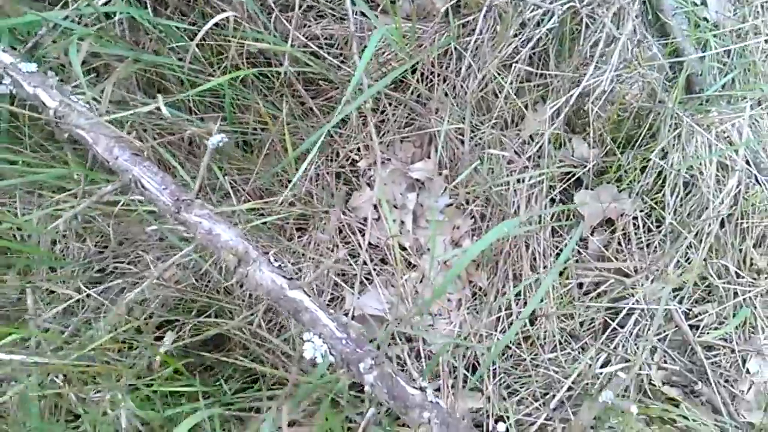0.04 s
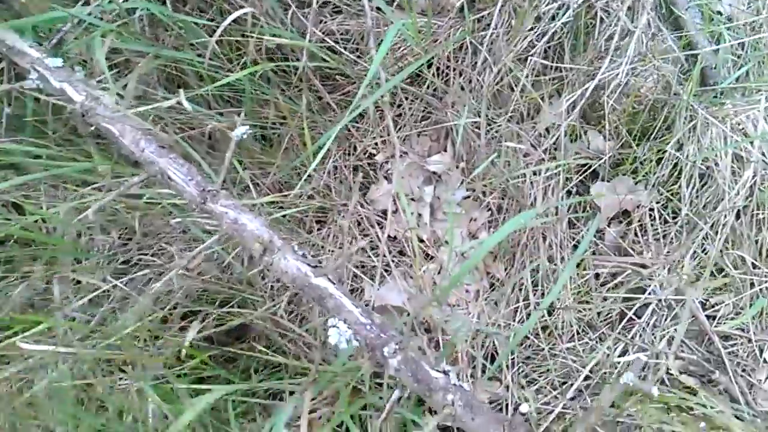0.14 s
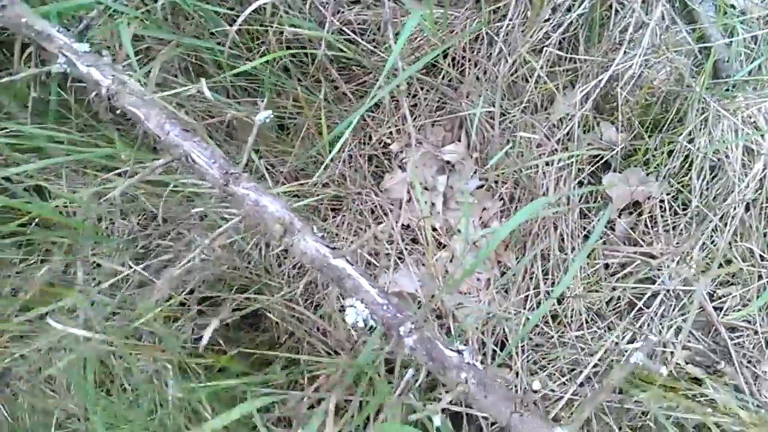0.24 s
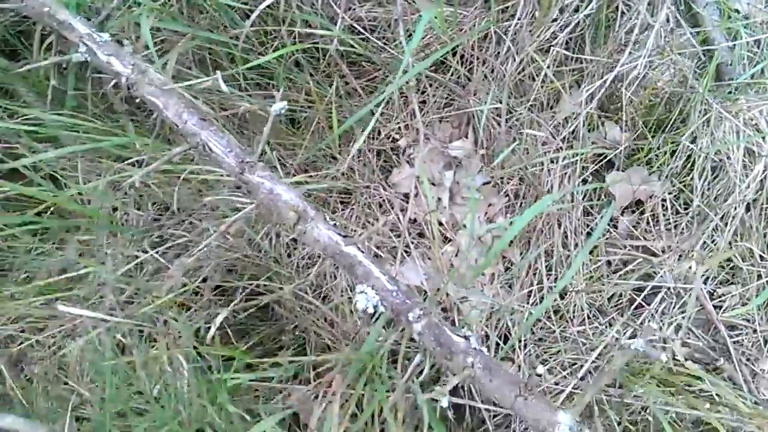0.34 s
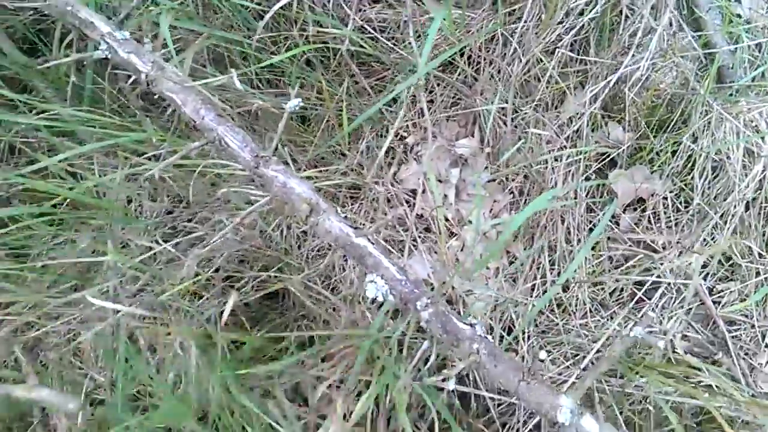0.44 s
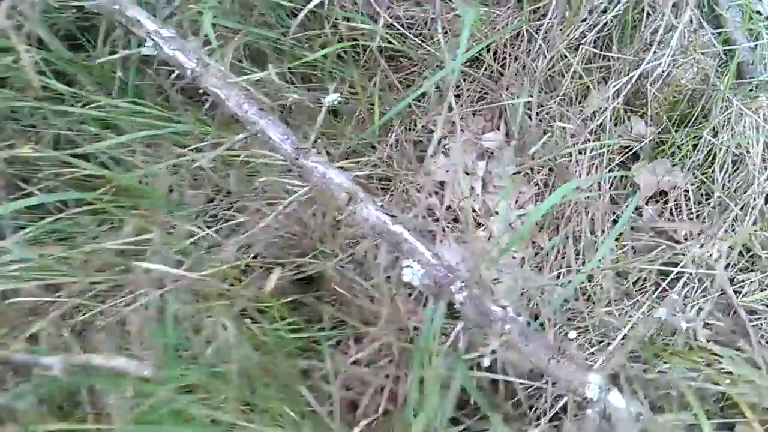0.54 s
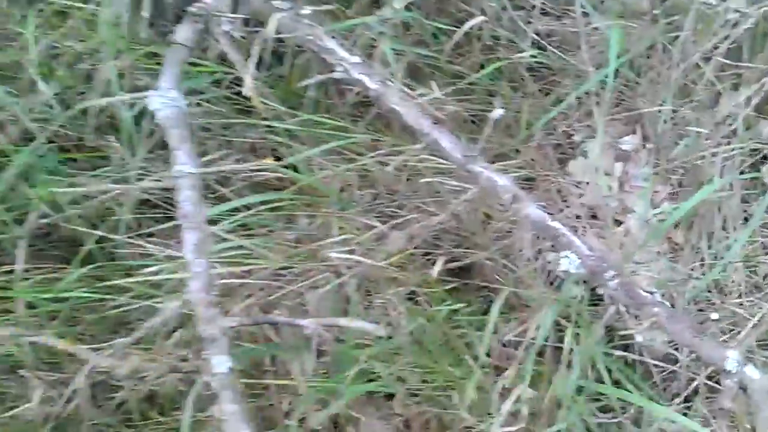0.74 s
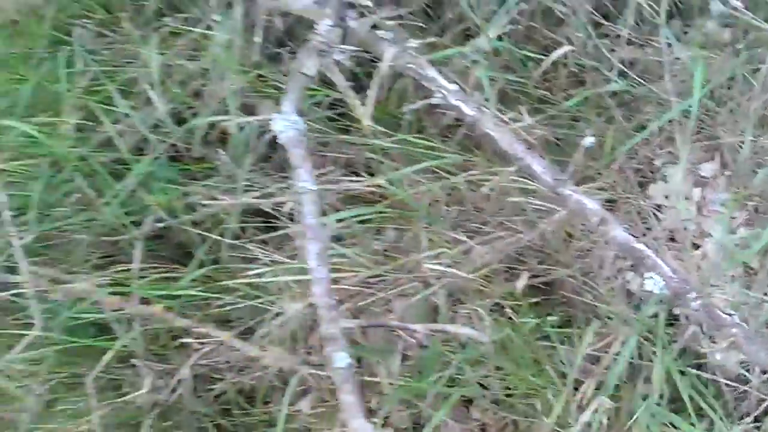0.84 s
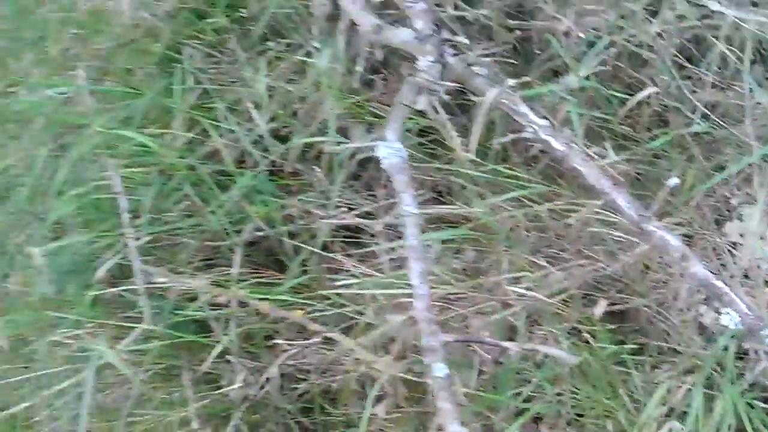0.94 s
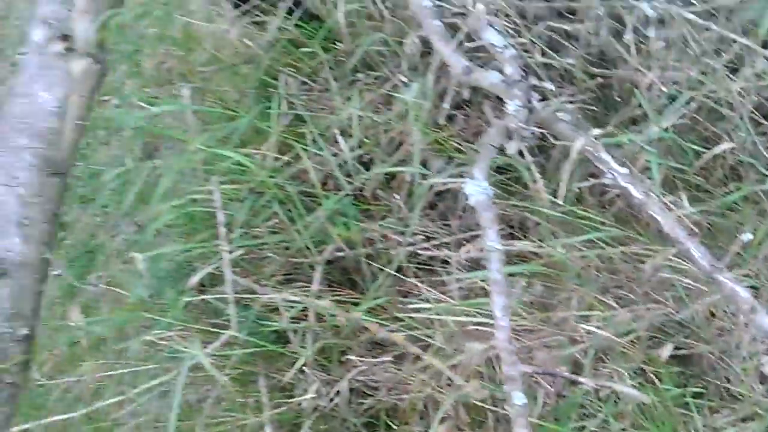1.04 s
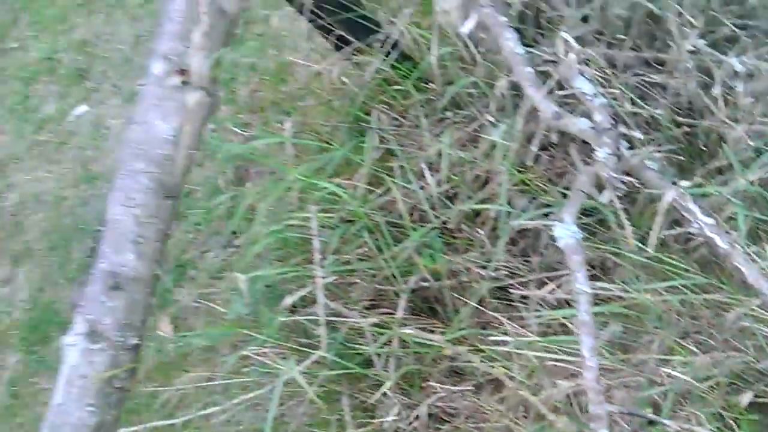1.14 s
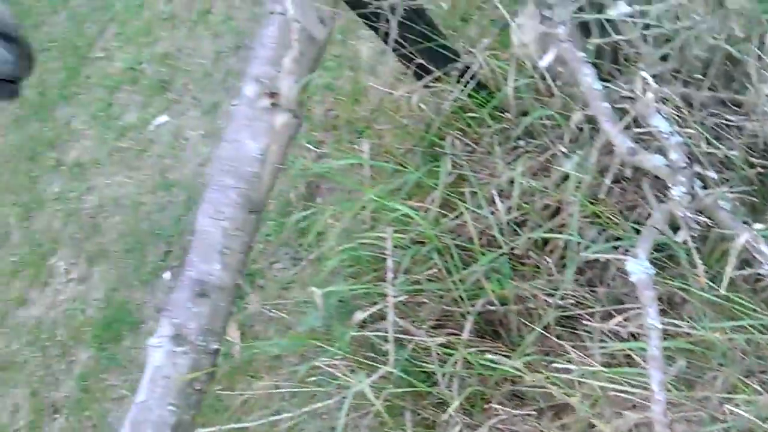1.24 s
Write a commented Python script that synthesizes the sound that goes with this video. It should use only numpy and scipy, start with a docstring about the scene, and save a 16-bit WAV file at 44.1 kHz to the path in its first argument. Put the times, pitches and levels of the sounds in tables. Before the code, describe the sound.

A brief crunch of dry grass swells as thin stems snap one by one, very close, outdoors. Then the hand-held microphone swings away with soft thuds, a low flutter of air and a few faint knocks of sticks.

```python
"""In a meadow, dry grass and thin dead twigs are pressed down close to a hand-held microphone.
Blades crackle, sticks knock and stems snap one by one in a crunch of half a second.
Soft low bumps and buffeting air follow as the microphone swings away. A faint hiss of air
lies underneath, and the microphone's small opening (its port) rings near 5.6 kHz on every click."""
import sys
import numpy as np
from scipy import signal
from scipy.fft import rfft, irfft
from scipy.io import wavfile

SR = 44100
rng = np.random.default_rng(int(sys.argv[2]) if len(sys.argv) > 2 else 0)


def store_wav(level_fs):
    """Save 16-bit WAV to argv[1]."""
    pcm = np.round(np.clip(np.atleast_2d(level_fs), -1, 1) * 32767)
    wavfile.write(sys.argv[1], SR, pcm.T.astype(np.int16))


N = 57330  # 1.3 seconds


def undb(db):
    """Turn decibels into a gain."""
    return 10 ** (np.asarray(db) / 20)


def unit(x):
    """Scale a signal to a spread of 1."""
    return x / (np.std(x) + 1e-12)


def with_energy(x, db):
    """Scale a short sound to a total energy in dB."""
    return x * undb(db) / (np.linalg.norm(x) + 1e-12)


def curve(rows):
    """Join (seconds, dB) points into a gain over time."""
    return undb(np.interp(np.arange(N) / SR, *np.array(rows).T))


def colour(x, points, size=1024):
    """Shape the tone along (Hz, dB) points; white noise keeps its overall level."""
    hz, db = np.array(points, float).T
    log_hz = np.log(np.fft.rfftfreq(size, 1 / SR) + 1)
    gain = undb(np.interp(log_hz, np.log(hz), db))
    # Fold the filter so that it rings only after a click, never before.
    cepstrum = irfft(np.log(gain))
    cepstrum[1:size // 2] *= 2
    cepstrum[size // 2 + 1:] = 0
    response = irfft(np.exp(rfft(cepstrum)))
    return signal.fftconvolve(x, with_energy(response, 0))[:len(x)]


def resonance(x, hz, width_hz):
    """Let through a band of sound around one pitch."""
    return signal.lfilter(*signal.iirpeak(hz, hz / width_hz, fs=SR), x)


def wander(per_s):
    """Drift between random values, with a spread of 1."""
    return unit(np.interp(np.arange(N) / SR * per_s, np.arange(N), rng.standard_normal(N)))


def clicks(per_s, spread_db):
    """Random tiny clicks, a few much stronger than the rest."""
    sizes = undb(spread_db * np.minimum(rng.exponential(size=N), 2 * np.pi))
    hits = rng.random(N) < per_s / SR
    return unit(hits * rng.choice([-1, 1], N) * sizes)


def add(out, start, sound):
    """Mix a sound in at a start time in seconds."""
    i = int(np.clip(start * SR, 0, N - 1))
    out[i:i + len(sound)] += sound[:N - i]


def thuds(rows, rise):
    """Tones that die after a few swings; rise is the swell time as a share of the fade time."""
    out, t = np.zeros(N), np.arange(SR // 8) / SR
    for start, hz, db, fade_ms in rows:
        age = t * 1000 / fade_ms
        envelope = (1 - np.exp(-age / rise)) * np.exp(-age)
        add(out, start, undb(db) * envelope / envelope.max() * np.sin(2 * np.pi * hz * t))
    return out


# How loud the air is. Each row: time in seconds, relative level in dB.
AIR_LEVELS = [(0, -56), (.8, -57.5), (.98, -58.5), (1.09, -58.5), (1.15, -56.5), (1.25, -56), (1.3, -56.5)]
# The tone of the air. Each row: frequency in Hz, relative level in dB.
AIR_TONE = [(30, 0), (100, -10.5), (400, 6), (900, 2), (1800, 4), (3000, -5.5), (4300, -10.5), (6200, -1.5),
            (8300, -12), (10500, -13), (13000, -20.5), (15500, -30)]


def air():
    """The meadow air hisses faintly and smoothly."""
    return colour(rng.standard_normal(N), AIR_TONE) * curve(AIR_LEVELS) * undb(-2)


# How loud the blades and the scraping stem are. Each row: time in seconds, relative level in dB.
RUSTLE_LEVELS = [(0, -57), (.04, -52.5), (.08, -45), (.15, -47.5), (.23, -44), (.31, -40), (.37, -37.5),
                 (.44, -37.5), (.47, -31), (.53, -33.5), (.575, -34), (.63, -31.5), (.66, -32), (.69, -38),
                 (.74, -46), (.82, -53), (.93, -55.5), (.98, -96), (1.3, -81)]
SCRAPE_LEVELS = [(.55, -77), (.68, -46.5), (.76, -52), (.85, -60.5), (.94, -56.5), (1.0, -75)]
# The tone of the blades. Each row: frequency in Hz, relative level in dB.
BLADE_TONE = [(60, -43), (300, -7), (620, -9.5), (1050, -0.5), (2050, 0), (2400, -2.5), (3200, -2.5),
              (4000, -9.5), (5000, -1.5), (6600, -4), (8300, -14), (10200, -12), (12500, -17.5),
              (15500, -31.5)]


def rustling_blades(scrape_hz=1467):
    """Dry blades crackle against each other in little surges; one stem scrapes as they settle."""
    crackle = clicks(per_s=12000, spread_db=2)
    surges = undb(1.2 * wander(per_s=220) - 4)
    rustle = colour(crackle * surges * curve(RUSTLE_LEVELS), BLADE_TONE)
    friction = clicks(per_s=12000, spread_db=2)
    scrape = resonance(friction, scrape_hz, width_hz=240)
    scrape = resonance(scrape, scrape_hz, width_hz=480)
    return rustle + unit(scrape) * curve(SCRAPE_LEVELS)


# Dull knocks of sticks. Each row: start in seconds, pitch in Hz, peak level in dB, fade time in ms.
STICK_KNOCKS = [(.063, 340, -46, 8.4), (.074, 399, -49.5, 18.6), (.100, 760, -42.5, 1.8),
                (.298, 780, -30, 1.55), (.4826, 1420, -22, 1.4), (.552, 407, -35.5, 3.4),
                (.6383, 1530, -15, 0.55), (.708, 476, -39, 5.5), (.727, 1000, -42.5, 5.5),
                (.787, 417, -37.5, 3.5), (.897, 900, -47, 5.4), (1.048, 840, -50.5, 6),
                (1.168, 960, -45.5, 3.5), (1.179, 828, -40.5, 5), (1.180, 1710, -40, .8),
                (1.213, 890, -50, 5.9)]
# The tone of wood, for sticks and stems. Each row: frequency in Hz, relative level in dB.
WOOD_TONE = [(60, -22.5), (300, -3.5), (600, -7), (1000, 1), (1900, 0), (2400, -1.5), (3200, 1.5),
             (4200, -14.5), (8000, -29.5)]


def knocking_sticks(bark_lag_s=0.0016, bark_db=-8):
    """Thicker sticks knock together, and their rough bark grates just after each touch."""
    knocks = thuds(STICK_KNOCKS, rise=0.21)
    hold = np.exp(-1 / (bark_lag_s * SR))
    contact = signal.lfilter([1 - hold], [1, -hold], np.abs(knocks))  # trails each knock's strength
    bark = colour(rng.standard_normal(N), WOOD_TONE)
    return knocks + undb(bark_db) * contact * bark


# Bumps on the microphone. Each row: start in seconds, pitch in Hz, peak level in dB, fade time in ms.
MICROPHONE_BUMPS = [(.106, 120, -42, 5.8), (.466, 108, -40, 16), (.522, 240, -40.5, 8.7),
                    (.618, 118, -35, 6.5), (.648, 171, -31, 5.8), (.694, 146, -33.5, 7.7),
                    (.752, 191, -31.5, 3.3), (.783, 228, -27.5, 4.2), (.794, 132, -33, 5.9),
                    (.906, 186, -38.5, 9.4), (1.071, 178, -35.5, 3.9), (1.107, 194, -33.5, 7.7),
                    (1.165, 182, -36, 7)]


def microphone_bumps():
    """Soft bumps on the microphone make low, short thuds."""
    return thuds(MICROPHONE_BUMPS, rise=0.38)


# Sharp clicks, mostly stems snapping; the one at 0.289 s is faint and bright, just before the loud snap at
# 0.292 s. Each row: start in seconds, ringing pitch in Hz, relative level in dB, fade time in ms, boost or cut
# of the woody part in dB.
SNAP_CLICKS = [(.2383, 5150, -10.5, 1.4, -11), (.2540, 5550, -14.5, .5, -13), (.2716, 5450, -12, .6, -9),
               (.2893, 6050, -10, .6, -12), (.2922, 5900, .5, 1.3, -10), (.2975, 5800, -.5, 1.6, -11),
               (.2998, 5850, -6, 6, -4), (.3315, 6000, -12, 1.5, -7), (.3337, 5950, -9.5, 1.4, -6),
               (.3541, 5500, -8, 3, 1), (.3620, 6900, -14.5, .5, -8), (.3942, 6000, -6.5, 2.4, -5),
               (.3978, 5550, -5.5, 3, -9), (.4088, 5200, -9.5, 2.8, -2), (.4262, 5650, -6, 3, -6),
               (.4430, 5450, -10.5, .9, -3), (.4480, 5650, -9, 3.5, -3), (.4552, 5600, -7, 1.7, -7),
               (.4583, 5700, -6.5, 1.8, -8), (.4612, 5350, -8.5, 1.6, -7), (.4662, 5520, -9, 1.3, -7),
               (.4908, 5620, -2.5, 1.8, -10), (.5183, 5850, -4.5, 1.5, 1), (.5213, 5750, -6, 3, -2),
               (.5595, 5550, -9, 1.4, -4), (.6204, 5300, -5, 1.1, -7), (.6275, 6200, -12, 2.5, -16),
               (.6460, 5350, 1.5, 1, -10), (.7978, 5050, -13, .8, -9)]
# The tones of each click's ring and bright edge. Each row: frequency in Hz, relative level in dB.
RING_TONE = [(200, -39), (1500, -30), (3800, -5), (4600, 4.5), (6500, 2), (8000, -1.5), (15500, -27.5)]
EDGE_TONE = [(4000, -45), (7000, -4.5), (10000, 7.5), (12500, -8), (15500, -23)]


def snap_clicks(size=1024, scatter_ms=2.8):
    """Stems click and splinter, thinner ones higher and brighter; a faint, bright click comes just before one
    loud snap."""
    ms = np.arange(size) / SR * 1000
    crackle = clicks(per_s=9000, spread_db=2.5)
    direct = np.zeros(N)
    for k, (start, hz, db, fade_ms, wood_db) in enumerate(SNAP_CLICKS):
        click_share = 0.61 / (1 + fade_ms / 2)  # a longer spray leaves less for the first click
        spray = crackle[k * size:(k + 1) * size] * np.exp(-ms / fade_ms)
        spray = np.sqrt(1 - click_share) * with_energy(spray, 0)
        spray[0] = np.sqrt(click_share)
        ringing = resonance(spray, hz, width_hz=1250)
        ring = with_energy(colour(ringing, RING_TONE), db=-5)
        edge = with_energy(colour(spray, EDGE_TONE), db=-16 + 0.0115 * (hz - 5613))
        body = spray + undb(7) * resonance(spray, hz=2030, width_hz=134)
        wood = with_energy(colour(body, WOOD_TONE), db=wood_db + 1.5)
        add(direct, start, undb(db) * (ring + edge + wood))
    # The undergrowth scatters the sound into a very short echo.
    echo = with_energy(rng.standard_normal(size) * np.exp(-ms / scatter_ms), db=-6)
    return direct + signal.fftconvolve(direct, echo)[:N]


# How loud the buffeting is. Each row: time in seconds, relative level in dB.
BUFFET_LEVELS = [(0, -76), (.12, -66), (.25, -63), (.42, -51.5), (.55, -52), (.64, -44), (.73, -50.5),
                 (.81, -38.5), (.91, -44), (.98, -46), (1.12, -48), (1.22, -50.5), (1.3, -61)]
# The tone of the buffeting. Each row: frequency in Hz, relative level in dB.
BUFFET_TONE = [(20, -1.5), (52, -21), (75, -2.5), (110, 2), (200, -0.5), (300, -7.5), (450, -20),
               (800, -40.5), (3000, -67)]


def buffeting():
    """Moving air flutters on the microphone with a low rumble."""
    flutter = rng.standard_normal(N) * undb(2 * wander(per_s=45.02))
    return colour(flutter * curve(BUFFET_LEVELS), BUFFET_TONE, size=8192)


def scene():
    """Mix the crunch, the bumps and the air into one channel."""
    crunch = snap_clicks() + rustling_blades() + knocking_sticks()
    return (crunch + microphone_bumps() + buffeting() + air())[None]


def record(dry, low_cut_hz=64.5, high_cut_hz=15650):
    """The microphone's port rings in the treble; the deepest bass and the highest treble are cut."""
    port_ring = undb(5) * resonance(dry, hz=5613, width_hz=2150)
    low_cut = signal.butter(2, low_cut_hz, "high", fs=SR, output="sos")
    high_cut = signal.ellip(10, .2, 70, high_cut_hz, fs=SR, output="sos")
    return signal.sosfilt(high_cut, signal.sosfilt(low_cut, dry + port_ring))


dry = scene()
out = record(dry)
store_wav(out)
```